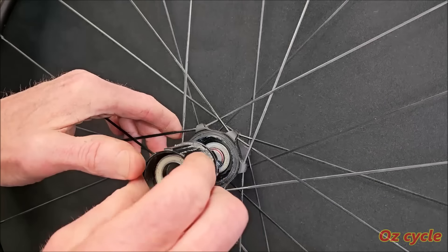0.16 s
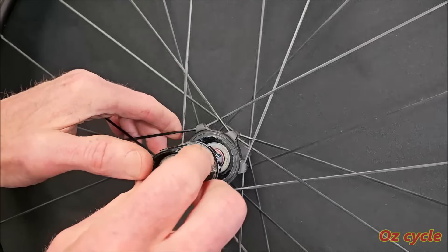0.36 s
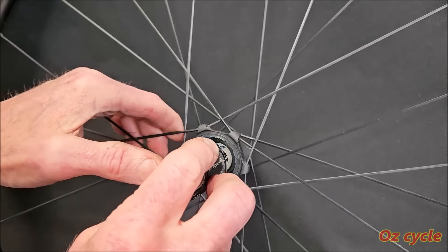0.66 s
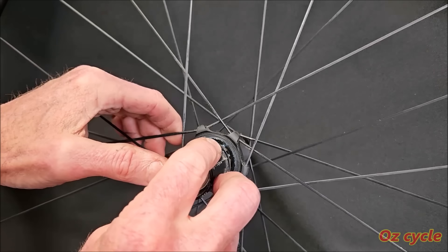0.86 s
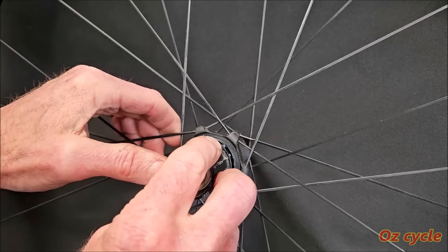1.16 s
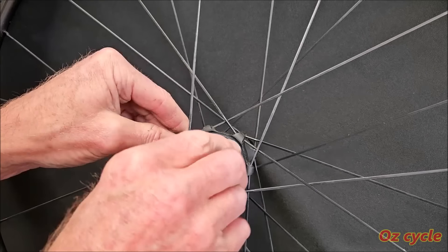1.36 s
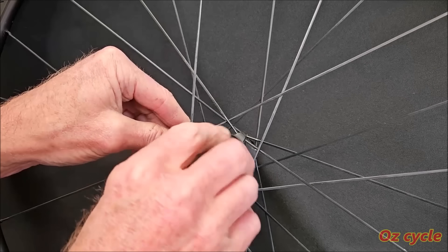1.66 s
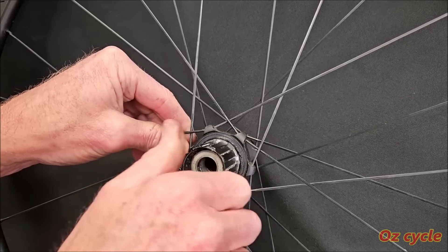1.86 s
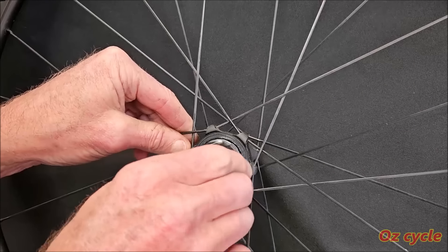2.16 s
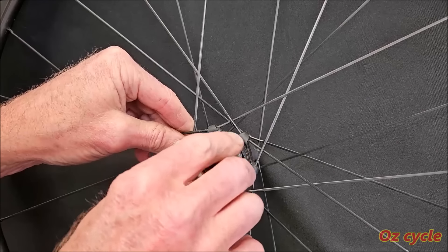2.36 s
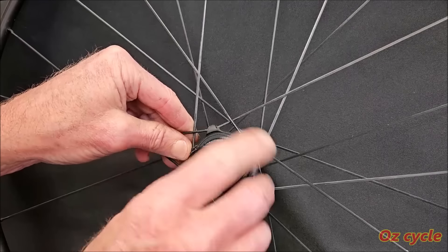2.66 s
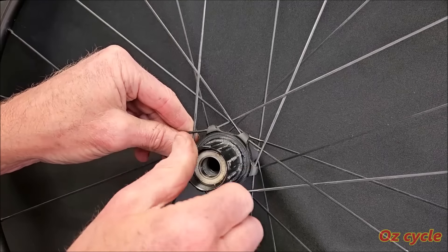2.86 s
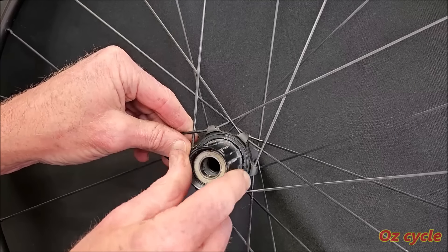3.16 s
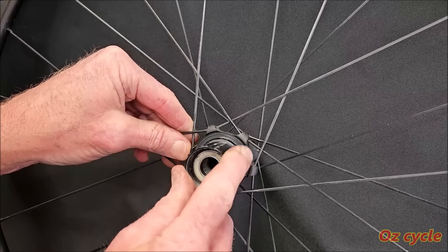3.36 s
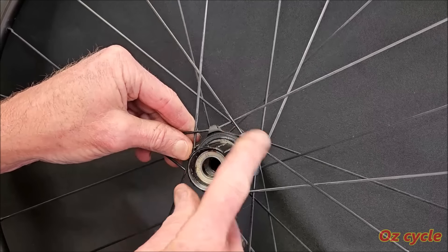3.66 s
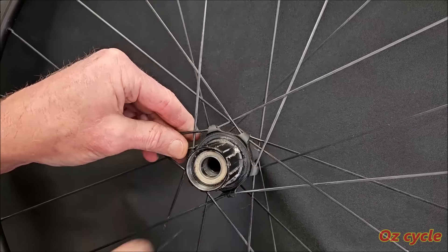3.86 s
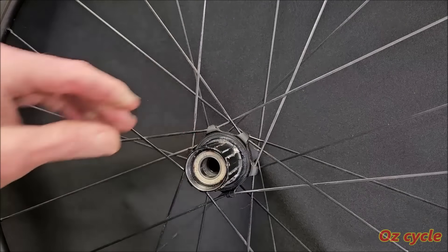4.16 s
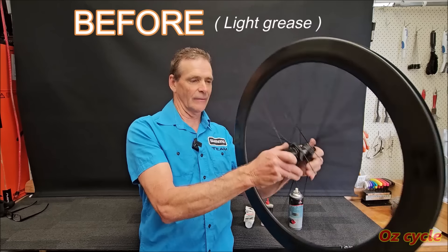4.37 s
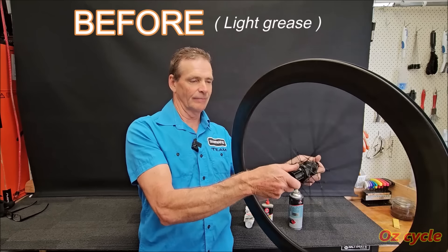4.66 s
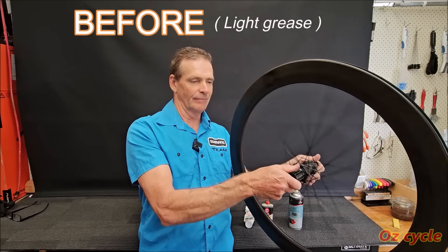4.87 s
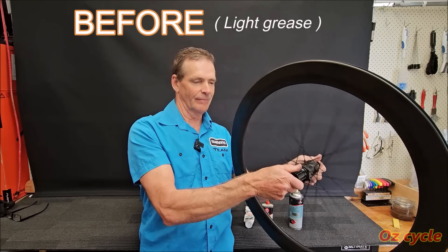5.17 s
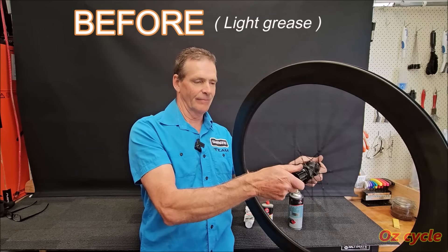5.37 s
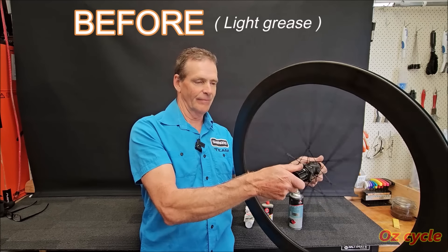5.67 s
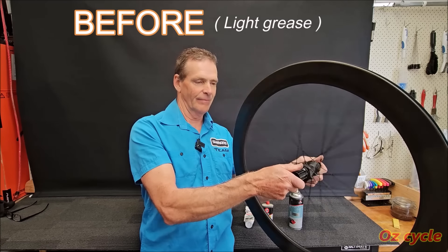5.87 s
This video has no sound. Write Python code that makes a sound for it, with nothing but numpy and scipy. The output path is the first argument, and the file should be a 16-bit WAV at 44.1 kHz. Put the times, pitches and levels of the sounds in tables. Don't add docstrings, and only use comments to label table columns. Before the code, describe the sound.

Metal clack on a spoked bicycle wheel, slow hand-turned pawl clicks, brief silence, then a harsh, bright ratchet buzz gradually slowing.

```python
import sys
import numpy as np
from scipy import signal
from scipy.fft import rfft, irfft
from scipy.io import wavfile
from scipy.ndimage import uniform_filter1d, minimum_filter1d

SR = 44100
rng = np.random.default_rng(int(sys.argv[2]) if len(sys.argv) > 2 else 0)


def rack_gain(trim_db):
    fader = np.asarray(trim_db, float)
    return 10 ** (fader / 20)


def put_to_file(sound):
    columns = np.atleast_2d(sound).T
    safe = np.clip(columns, -1, 1)
    whole_steps = np.round(safe * 32767)
    wavfile.write(sys.argv[1], SR, whole_steps.astype(np.int16))


N = 265834
BENCH_END_S, HELD_START_S = 4.377, 4.44
GAIN_STEP_S = 1.4
SPIN_START_S = 4.6493

# frequency in Hz, density in dB per Hz.
RUMBLE = [
    [(12, -53), (20, -10), (54, 1), (76, -15), (156, -10.5), (296, -22.5), (400, -53), (520, -59), (880, -120)],
    [(12, -56), (20, -35), (32, -26), (46, -7), (80, 13), (158, 13), (400, -1), (520, -39), (880, -120)],
]
HISS = [
    [(150, -10), (250, -4), (493, -7.5), (710, -7.5), (890, -8.5), (2360, -15), (2710, -18.5), (3060, -16), (5830, -25.5), (7440, -22), (16000, -42)],
    [(150, -12), (250, 1.5), (430, 8.5), (860, -1.5), (1240, -2.5), (3230, -4.5), (4570, -7.5), (16000, -32)],
]
# frequency in Hz, correlation from -1 to 1.
STEREO_LIKENESS = [(60, 0.91), (240, 0.63), (950, -0.19), (3770, 0.061), (15000, -0.52)]
# start in seconds, rise over the floor in dB, fall in dB per second.
STIRS = [
    (.74, 3, 6),
    (1.48, 11.5, 15.5),
    (2.3, 7.5, 12),
    (3.2, 4, 5),
    (3.53, 4.5, 7),
    (3.98, 5.5, 11),
]
# start in seconds, level in dB, frequency in Hz.
CHIRPS = [(.001, -73, 7300), (.224, -77, 8900), (.38, -84, 8600), (1.028, -75.5, 7950), (1.085, -81, 7400),
          (1.257, -86, 9100), (2.922, -73, 7320), (3.005, -70.5, 7450), (3.818, -70, 7200),
          (4.033, -64.5, 7450), (4.153, -70, 8300), (4.217, -70, 7500)]
# start in seconds, level in dB, frequency in Hz, length in seconds.
SQUEAKS = [(0.26, -69, 1250, 0.074), (0.453, -78, 3400, 0.048), (.5, -77, 4050, 0.027),
           (0.67, -75, 2970, 0.11), (.72, -76, 1770, 0.11), (0.848, -76, 2980, 0.2),
           (0.943, -72, 1750, 0.093), (1.06, -77, 3630, 0.056), (3.936, -64, 3240, 0.042),
           (4.08, -69, 3180, 0.052)]
# start in seconds, peak in dB, ring time factor set by the fingers.
KNOCKS = [
    (0.057, -48.5, 0.46),
    (.64, -68, 1.5),
    (0.745, -51.5, 0.13),
    (.93, -62, 1.5),
    (1.445, -55, 0.16),
    (1.499, -35, 0.13),
    (1.514, -13, 0.99),
    (2.118, -38, 1.64),
    (3.935, -50.5, 0.33),
    (3.995, -53.5, 1.1),
]
WHEEL_HZ = [441, 549, 632, 847, 874, 1166, 1319, 1410, 1545, 1793, 1970, 2272, 2309, 2353, 2536, 2600, 2837,
            2955, 3607, 4242]
# level in dB, 60 dB decay time in seconds.
WHEEL_MODES = [(-16.5, 0.82), (-19.5, 1), (-3, 0.33), (-7.5, 0.56), (-5.5, 0.54), (0, 0.57), (0.5, 0.39),
               (-4.5, 0.19), (-11, 0.48), (-8.5, 0.29), (-12.5, 0.15), (-1, 0.27), (-10, 0.48), (3, 0.18),
               (-13, 0.11), (0, 0.13), (-5.5, .2), (-0.5, 0.16), (-5, 0.27), (-21, 0.17)]
# start in seconds, level in dB.
TOUCHES = [
    (0.058, -65.5),
    (0.063, -58.5),
]
# frequency in Hz, level in dB, 60 dB decay time in seconds.
TOUCH_MODES = [(1380, -14, 0.49), (1680, -5.5, 0.46), (2130, 4, 0.055), (3160, -5, 0.083)]
# start in seconds, peak in dB, frequency in Hz, decay time in seconds.
BUMPS = [(.745, -48, 317, 0.033), (1.4, -74, 2200, 0.082), (1.446, -42, 147, 0.063),
         (1.478, -30, 167, 0.073), (1.487, -19, 109, 0.028), (1.511, -32.5, 69.6, .12),
         (1.506, -25, 262, 0.13), (1.683, -44.5, 3800, 0.035), (1.912, -49, 3900, 0.053),
         (1.913, -52.5, 2550, 0.037), (2.115, -44, 1130, 0.099), (2.117, -32, 252, 0.096),
         (2.118, -39.5, 129, 0.087), (2.748, -45.5, 186, 0.041), (4.049, -51.5, 210, .06)]
# start in seconds, level in dB, treble loss in dB per octave, ring time factor.
GRIPS = [
    (4.44, -38, 6, 2.5),
    (4.496, -31, -0.5, 1.16),
    (4.522, -44, 3.0, 1.5),
    (4.53, -48.5, 0.5, 2.7),
]
# frequency in Hz, level in dB, 60 dB decay time in seconds.
GRIP_MODES = [(540, -0.5, 0.034), (1060, -11, 0.013), (1524, 2.5, 0.02), (1830, 0.5, 0.038),
              (5100, -13.5, 0.025), (8000, -16.5, 0.027)]
# start in seconds, peak in dB, treble loss in dB.
SEATING = [(1.4888, -30, 10), (1.493, -29.5, -1.5), (1.5024, -39, 1.5), (1.5153, -34, -2.5),
           (1.668, -43, -3), (1.682, -27.5, 2.5), (1.725, -39, -7), (1.7533, -25, 5), (1.814, -54, -4),
           (1.9121, -39, 9), (1.9914, -42, 12)]
# start in seconds, peak in dB.
FIRST_TURN = [(2.1293, -26.5), (2.158, -25), (2.183, -24.5), (2.2079, -26), (2.2384, -23), (2.266, -27),
              (2.2872, -30), (2.308, -28), (2.3306, -24), (2.3602, -22.5), (2.4082, -20.5), (2.452, -25.5),
              (2.4816, -21), (2.5047, -23.5), (2.5267, -22), (2.5494, -21.5), (2.58, -22.5),
              (2.6265, -24.5)]
# start in seconds, peak in dB.
SECOND_TURN = [(3.157, -33.5), (3.2115, -30.5), (3.2766, -30), (3.3096, -30), (3.3448, -29), (3.3847, -30),
               (3.4308, -28.5), (3.4686, -28.5), (3.5031, -29.5), (3.5358, -28), (3.5755, -28),
               (3.6193, -30), (3.674, -31.5)]
# frequency in Hz, bandwidth in Hz, level in dB.
HUB_BENCH = [(1578, 41, 7), (1700, 76, 1.5), (2122, 31, 7.5), (2360, 40, 0.5), (2716, 23, -1),
             (2871, 8.3, -3), (3500, 87, -4), (3730, 23, 2.5), (3900, 310, -4), (4970, 99, -5.5),
             (6000, 110, 0.5), (7400, 100, -4.5), (8300, 120, -1), (8300, 140, 1.5), (9230, 250, -2),
             (10040, 73, -5), (12000, 144, -21), (11300, 46, -3), (12570, 41, 0.5), (14200, 160, -8)]
HUB_HELD = [(1168, 3.9, -14), (1820, 36, -1.5), (2200, 40, 1), (2360, 78, 1), (2890, 90, -0.5),
            (3540, 37, -0.5), (3800, 16, -5), (4266, 47, -2), (5110, 79, -6.5), (5780, 71, -2),
            (6200, 13, -5.5), (6600, 37, -8), (8015, 184, 1.5), (9700, 220, -6)]
# frequency in Hz, density in dB per Hz.
TICK_BENCH = [(350, -58.5), (600, -48), (1030, -18.5), (1550, -5.5), (1880, -18.5), (2210, -4.5),
              (2570, -12.5), (3580, -7.5), (4710, -17.5), (8270, -17.5), (12800, -21.5), (16000, -16)]
TICK_HELD = [(180, -45), (953, -41.5), (1780, -11.5), (2320, -12.5), (3510, -8.5), (4650, -14.5),
             (7250, -15), (8140, -13), (15500, -23.5)]
# frequency in Hz, 60 dB decay time in seconds.
ROOM = [(200, 0.34), (1000, 0.4), (4000, 0.2), (14000, 0.089)]
# start in seconds, length in seconds,
# range under the nearby maximum that survives in dB, loss of the rest in dB.
THINNED = [(4.803, .024, 5, 40), (4.913, .021, 5, 40), (5.638, .0117, 6, 45), (5.661, .015, 6, 45),
           (5.054, .011, 6, 16), (5.098, .009, 6, 12), (5.184, .009, 6, 11), (5.224, .011, 6, 12)]


def evened(x):
    return x / np.sqrt(np.mean(x ** 2) + 1e-20)


def read(points, hz):
    f, value = np.transpose(points)
    return np.interp(np.log(hz + 1), np.log(f + 1), value)


def add(mix, s, sound):
    part = mix[..., max(round(s * SR), 0):][..., :sound.shape[-1]]
    part += sound[..., :part.shape[-1]]


def ring(x, hz, width):
    pole = np.exp((2j * np.pi * hz - np.pi * width) / SR)
    return signal.lfilter([1 - abs(pole)], [1, -pole], x).imag


def stepped(levels_db):
    return np.interp(np.arange(N) / SR - GAIN_STEP_S, (-.01, .01), levels_db)


def air(shot, rumble_db, hiss_db):
    n, hz = len(rumble_db), np.fft.rfftfreq(1024, 1 / SR)
    out = np.zeros((2, n))
    layers = [(RUMBLE[shot], rumble_db, 420), (HISS[shot], hiss_db, 16500)]
    for shape, level_db, top_hz in layers:
        a, b, c, d, patches = rng.standard_normal((n // 256 + 5, 513, 5)).T
        patches = evened(uniform_filter1d(uniform_filter1d(patches, 14, 0), 10, 1))
        same = np.clip(read(STEREO_LIKENESS, hz), -1, 1)[:, None]
        left = a + 1j * b
        right = same * left + np.sqrt(1 - same ** 2) * (c + 1j * d)
        patchy_db = 1.3 * patches
        gain = rack_gain(read(shape, hz)[:, None] + patchy_db) * (hz < top_hz)[:, None]
        noise = signal.istft(np.array([left, right]) * gain, nperseg=1024, noverlap=768)[1][:, :n]
        out += evened(noise) * rack_gain(level_db)
    return out


def bench_air():
    out, t = np.zeros((2, N)), np.arange(0, HELD_START_S, 1 / SR)
    rise_db_per_s, hiss_share = 108, 0.71
    swells = [db - np.maximum(fall * (t - s), rise_db_per_s * (s - t)) for s, db, fall in STIRS]
    stir_db = np.max(swells, axis=0).clip(0)
    rumble_db = stepped((-63.5, -58.5))[:len(t)] + stir_db
    hiss_db = stepped((-69, -65))[:len(t)] + hiss_share * stir_db
    add(out, 0, air(0, rumble_db, hiss_db))
    return out


def self_noise():
    band = signal.butter(1, [5500 / SR * 2, 11000 / SR * 2], "band")
    hiss = signal.lfilter(*band, rng.standard_normal((2, N)))
    creep_db_per_s = 3.7
    return hiss * rack_gain(stepped((-99, -81)) + creep_db_per_s * np.arange(N) / SR)


def chirps():
    out = np.zeros((2, N))
    squeaks = [(*row, 45) for row in SQUEAKS]
    whistles = [(*row, 0.069, 900) for row in CHIRPS]
    for s, db, hz, length, width in squeaks + whistles:
        n = round(length * SR)
        tone = evened(ring(rng.standard_normal((2, n)), hz, width))
        add(out, s, rack_gain(db) * tone * np.hanning(n))
    return out


def knocks():
    out, t = np.zeros((2, N)), np.arange(SR // 2 + SR // 4) / SR
    band = signal.butter(2, [500 / SR * 2, 4000 / SR * 2], "band")
    side_db = 1.5
    for s, peak_db, damping in KNOCKS:
        weights = rng.standard_normal((len(WHEEL_MODES), 2, 2))
        clatter = rack_gain(-6.5 - 60 * t / 0.017) + rack_gain(-16.5 - 60 * t / (.2 * damping))
        sound = signal.lfilter(*band, clatter * rng.standard_normal((2, len(t))))
        for hz, (db, t60), w in zip(WHEEL_HZ, WHEEL_MODES, weights):
            apart = min(hz / 1300, 1)
            uneven = w[1][:, None]
            turn = 2 * np.pi * hz * t + 3 * w[0, 0] + apart * np.array([[.7], [-.7]])
            fade = rack_gain(db - 13.5 + side_db * apart * uneven - 60 * t / (min(t60, 1.2) * damping))
            beating = np.sin(turn) + .35 * np.sin(1.011 * turn) + .3 * np.sin(.983 * turn + 3 * uneven)
            sound += fade * beating * (1 - np.exp(-t * hz / 4.1))
        add(out, s, rack_gain(peak_db) * sound)
    return out


def bumps():
    out, t = np.zeros(N), np.arange(SR // 4) / SR
    touches = [(s, db + rel, hz, t60) for s, db in TOUCHES for hz, rel, t60 in TOUCH_MODES]
    grips = [(s, db + rel - loss * np.log2(hz / 500), hz, t60 * longer)
             for s, db, loss, longer in GRIPS for hz, rel, t60 in GRIP_MODES]
    for s, peak_db, hz, t60 in [*BUMPS, *touches, *grips]:
        rough = evened(ring(rng.standard_normal(len(t)), hz, 0.31 * hz))
        push = np.sin(2 * np.pi * hz * t) + 0.87 * rough * np.minimum(t * hz, 1)
        add(out, s, rack_gain(peak_db - 60 * t / t60) * push)
    return out


def causal(points):
    gain = np.log(rack_gain(np.maximum(read(points, abs(np.fft.fftfreq(4096, 1 / SR))), -90)))
    taps = np.fft.ifft(np.exp(gain - 1j * signal.hilbert(gain).imag)).real[:1024]
    return taps / np.linalg.norm(taps)


def wander(hits, hz, width):
    turn, r = np.exp(2j * np.pi * np.cumsum(hz) / SR), np.exp(-np.pi * width / SR)
    return (turn * signal.lfilter([1 - r], [1, -r], hits / turn)).imag


def ratchet(s, peak_db, dull_db, hub, tick, spread_s, rattle_db, rattle_t60, ring_db, count=40, channels=1):
    landing_s = s[:, None] + spread_s * rng.gamma(3.2, 1, (len(s), count))
    at = (landing_s * SR).astype(int)
    blow = rack_gain(3.2 * rng.standard_normal(at.shape)) * rng.choice([-1., 1.], at.shape)
    blow *= rack_gain(peak_db[:, None]) / np.linalg.norm(blow, axis=1)[:, None]
    start, n = at.min(), at.max() - at.min() + SR // 4
    when = (at - start).ravel()

    train = np.bincount(when, (blow * rack_gain(-dull_db[:, None])).ravel(), n)
    fall = rack_gain(-60 / rattle_t60 / SR) ** 2
    envelope = np.sqrt(signal.lfilter([1 - fall], [1, -fall], train ** 2))
    rattle = envelope * rng.standard_normal((channels, n))
    x = signal.oaconvolve(train + rack_gain(rattle_db) * rattle, causal(tick)[None])[:, :n]

    for hz, width, db in hub:
        treble = rack_gain(-dull_db[:, None] * (hz > 5000))
        drift = np.interp(np.arange(n), at[:, 0] - start, rng.standard_normal(len(s)))
        side = rack_gain(2.5 * rng.standard_normal((channels, len(s), 1)))
        side = side * rng.standard_normal((channels,) + at.shape)
        hits = np.array([np.bincount(when, (blow * treble * ear).ravel(), n) for ear in side])
        x += rack_gain(ring_db + db) * wander(hits, hz * (1 + .008 * drift), width + .012 * hz)
    out = np.zeros((channels, N))
    add(out, start / SR, x)
    return out


def hand_turns():
    first = [(s, db, np.interp(s, (2.42, 2.71), (6, -3.0))) for s, db in FIRST_TURN]
    flick_dull_db = -7.5
    second = [(s, db, flick_dull_db) for s, db in SECOND_TURN]
    s, peak_db, dull_db = np.transpose([*SEATING, *first, *second])
    left, right = ratchet(s - .001, peak_db + 8.0, dull_db, HUB_BENCH, TICK_BENCH, spread_s=.001,
                          rattle_db=0.016, rattle_t60=0.087, ring_db=14.1, channels=2)
    return np.array([rack_gain(4.5) * left, rack_gain(3.0) * np.roll(right, 4)])


def room(x, channels):
    taps = np.zeros((channels, SR // 2))
    start = np.arange(100, SR // 2 - 20, 20)
    at = start + rng.integers(0, 20, (channels, len(start)))
    np.put_along_axis(taps, at, rng.choice([-1., 1.], at.shape), 1)
    hz, t, z = signal.stft(taps, SR, nperseg=128)
    tail = signal.istft(z * rack_gain(-60 * t / read(ROOM, hz)[:, None]), SR, nperseg=128)[1]
    wet = signal.fftconvolve(x, tail / np.linalg.norm(tail[0]), axes=1)[:, :N]
    shared = wet.mean(0)
    return shared + signal.lfilter(*signal.butter(1, 900 / SR * 2, "high"), wet - shared)


def held_air():
    out, t = np.zeros(N), np.arange(BENCH_END_S, N / SR, 1 / SR)
    fall_db_per_s = 120
    swish_db = (4.5 - fall_db_per_s * abs(t - SPIN_START_S)).clip(0)
    add(out, BENCH_END_S, air(1, -54.5 + 0 * t, -56 + swish_db)[0])
    return out


def spin(count):
    tooth, wobble = np.arange(count), rng.standard_normal((count, 2))
    gap_s, drag_s_per_tooth = .018749, 2.3634e-5
    catch_up_s, catch_up_teeth = .0203, 2.0
    jitter_s, uneven_db = 0.00053, .8
    when = SPIN_START_S + gap_s * tooth + drag_s_per_tooth * tooth ** 2 / 2
    when = when + catch_up_s * (1 - np.exp(-tooth / catch_up_teeth)) + jitter_s * wobble[:, 0]
    peak_db = 0.5 + uneven_db * wobble[:, 1]
    return ratchet(when - .001, peak_db, 0 * when, HUB_HELD, TICK_HELD, spread_s=.00085,
                   rattle_db=-1.1, rattle_t60=0.045, ring_db=19.8)


def turning(x, count):
    turns_per_s = 2.9
    turn = np.pi * (turns_per_s * np.arange(N) / SR + np.arange(count)[:, None] / count)
    return room(x * np.sqrt(2 / count) * np.cos(turn), channels=count).sum(0)


def scene():
    t, soft = np.arange(N) / SR, bumps()
    teeth, struck = hand_turns(), knocks()
    echo = room(teeth + .3 * struck, channels=2)
    bench = bench_air() + self_noise() + chirps() + struck + soft + teeth + rack_gain(-6.0) * echo

    held = signal.lfilter(*signal.butter(2, 1250 / SR * 2, "high"), spin(count=70)) + rack_gain(-17.5) * soft
    held = held + rack_gain(-2.5) * turning(held, count=4) + soft + held_air()
    held = signal.sosfilt(signal.butter(3, 50.0, "high", fs=SR, output="sos"), held)

    bench_fade = np.clip((BENCH_END_S - t) / .002, 0, 1)
    held_fade = np.clip((t - HELD_START_S) / 0.00096, 0, 1)
    return bench * bench_fade + held * held_fade


def top_cut(x):
    return signal.sosfilt(signal.butter(12, 16530, fs=SR, output="sos"), x)


def record(dry):
    low_pass = signal.firwin(255, 15800, window=("kaiser", 4), fs=SR)
    dry = signal.oaconvolve(dry, low_pass[None], "same")
    dry = signal.sosfilt(signal.butter(2, 28.0, "high", fs=SR, output="sos"), dry)
    out, edge = dry.copy(), 500
    for s, length, range_db, depth_db in THINNED:
        start, n = round(s * SR) - edge, round(length * SR) + 2 * edge
        fade = signal.windows.tukey(n, 2 * edge / n)
        z = rfft(dry[:, start:start + n] * np.sqrt(fade))
        power_db = 10 * np.log10(abs(z) ** 2 + 1e-20)
        near_db = -minimum_filter1d(-power_db, size=71, axis=1)
        strong = (power_db > power_db.max() - 19) & (power_db > near_db - range_db)
        kept = z * np.where(strong, 1, rack_gain(-depth_db))
        kept *= np.linalg.norm(z) / np.linalg.norm(kept)
        add(out, start / SR, irfft(kept - z, n) * np.sqrt(fade))
    return top_cut(out)


dry = scene()
out = record(dry)
put_to_file(out)
```